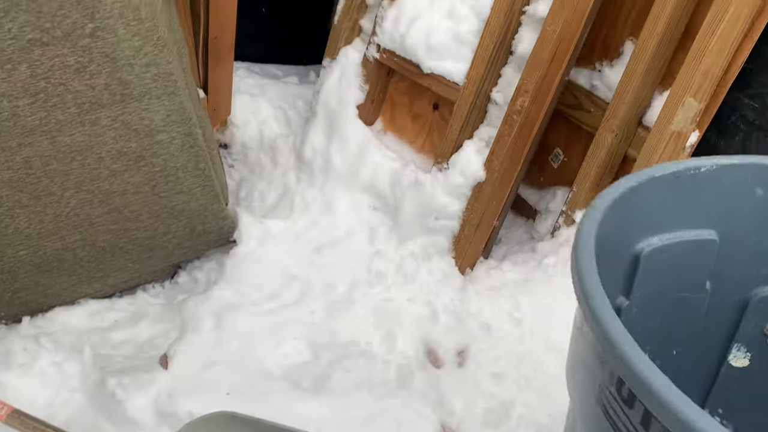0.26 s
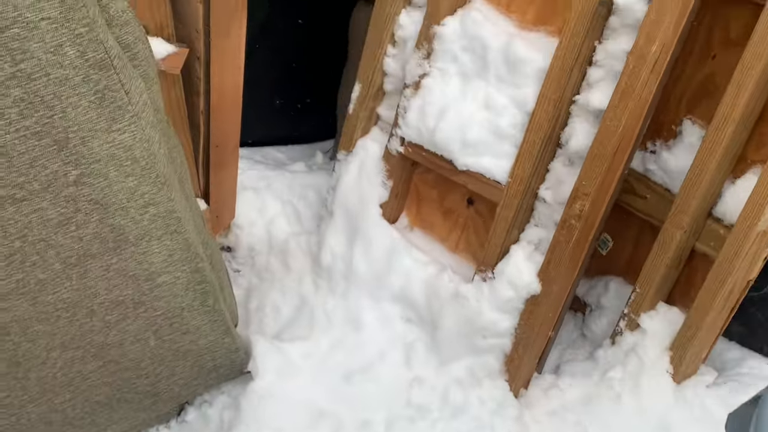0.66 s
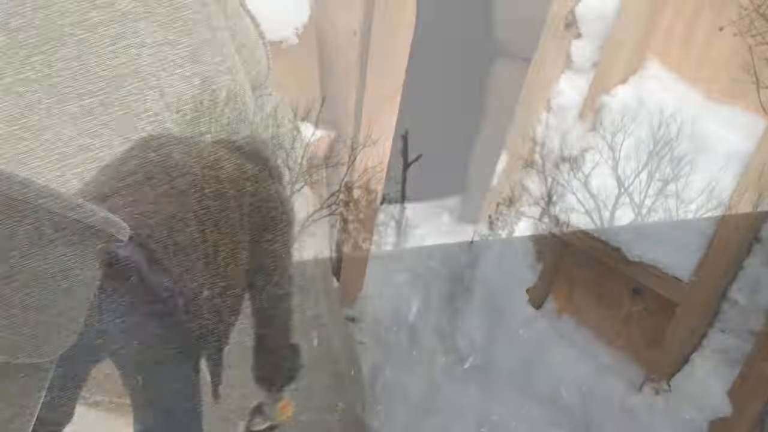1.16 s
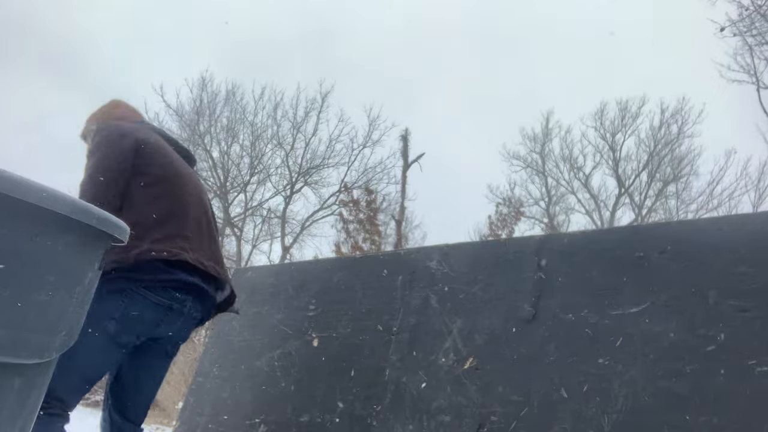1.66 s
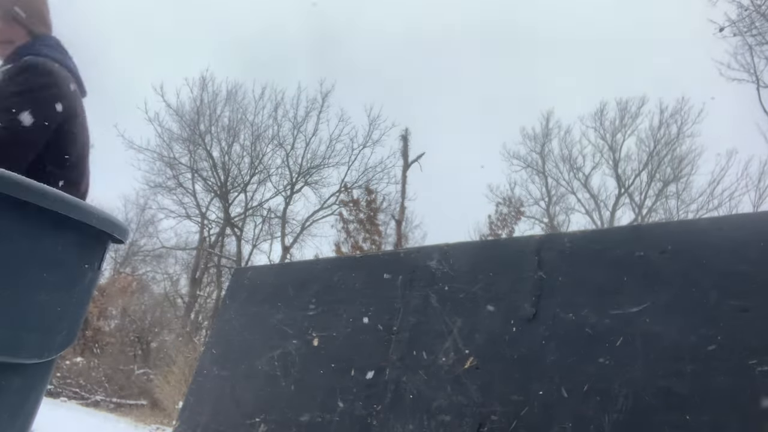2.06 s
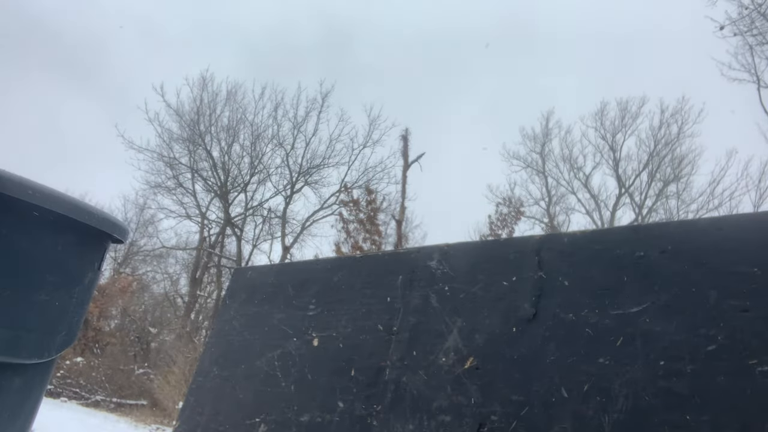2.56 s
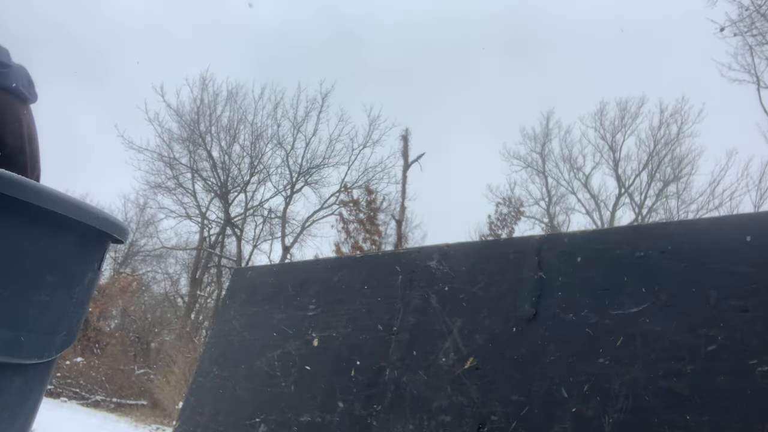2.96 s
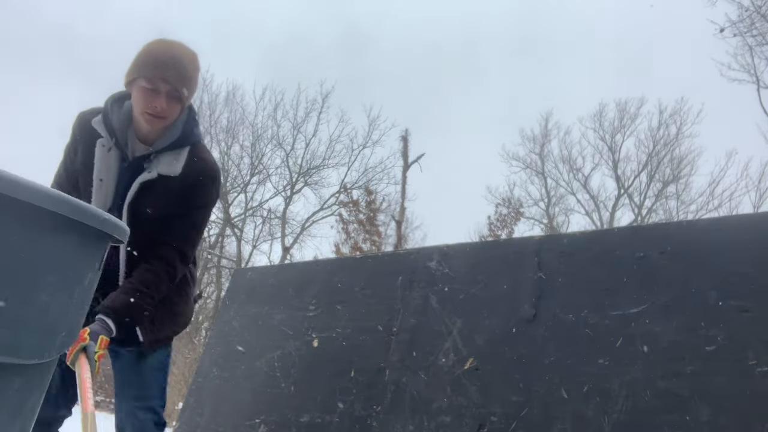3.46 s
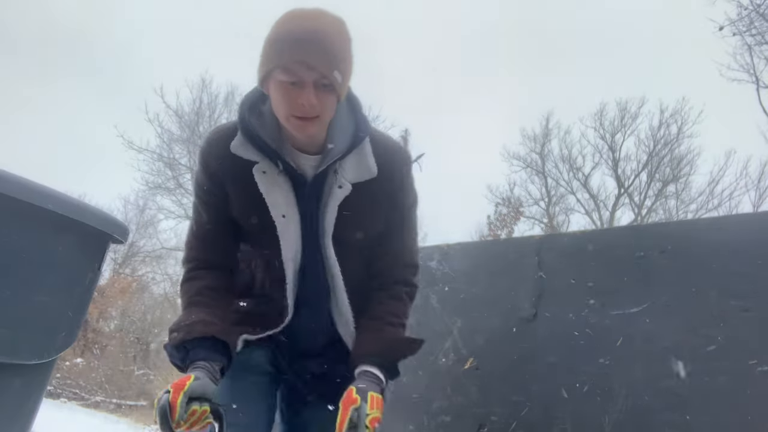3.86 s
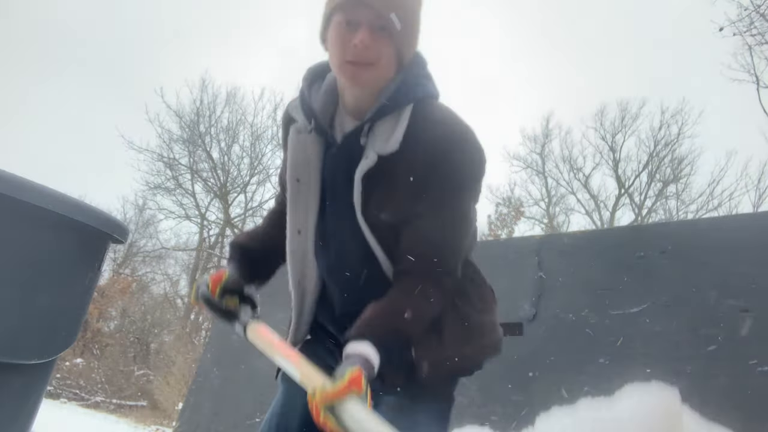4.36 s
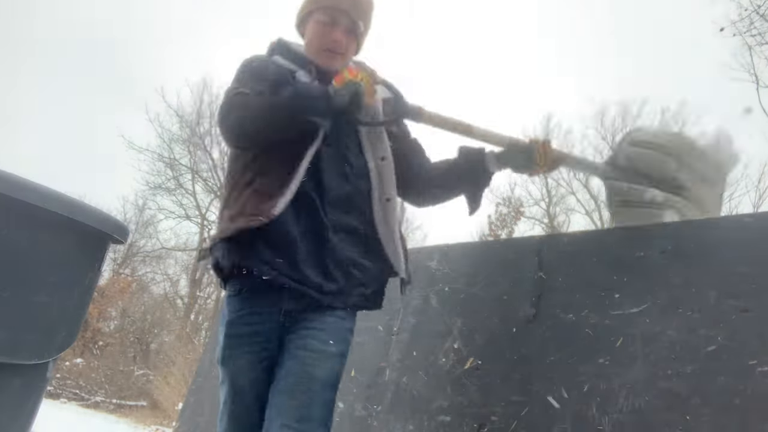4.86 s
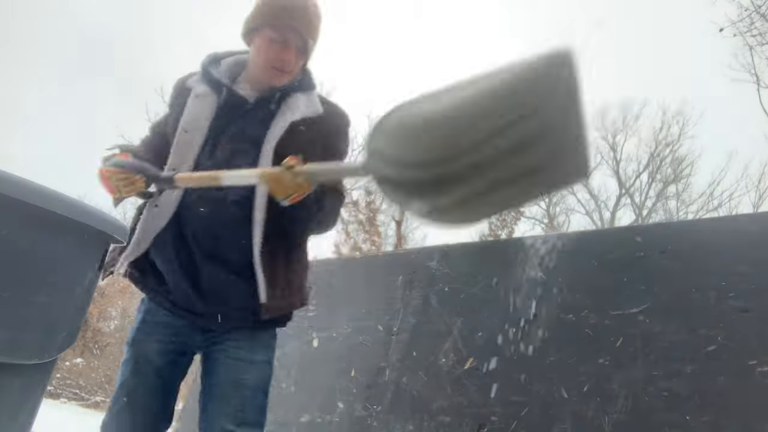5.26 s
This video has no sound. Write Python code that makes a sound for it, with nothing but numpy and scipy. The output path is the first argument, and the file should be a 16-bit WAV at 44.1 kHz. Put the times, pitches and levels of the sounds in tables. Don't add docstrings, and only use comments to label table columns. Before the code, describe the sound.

From 0 to about 1 s the sound is muffled, as from a hand-held phone: small crust cracks, soft shuffling, low buffeting air and a run of quick dull bumps, strongest near 0.85 s. The treble then opens up; a faint push is heard and a light handle tap at 1.3 s. A crunchy scoop with low soft footfalls comes at 1.45-1.7 s, followed by quieter steps around 2 s. At 2.4 s the blade knocks sharply on ice, rebounds and digs until 2.75 s. Muted snow lumps and shuffles follow. At 3.3 s the edge stabs the crust and scrapes long, bright and gritty, in juddering bursts until 3.95 s. Quiet treads and soft crunches fill 4-4.9 s. A loud hollow board thud booms at 5.0 s, with a low tread, dropping lumps and a light dragging scrape to 5.5 s. Faint distant traffic, fine snow hiss and short close echoes surround it.

```python
import sys
import numpy as np
from scipy import signal
from scipy.fft import rfft, irfft, next_fast_len
from scipy.io import wavfile
from scipy.ndimage import uniform_filter1d

SR = 44100
rng = np.random.default_rng(int(sys.argv[2]) if len(sys.argv) > 2 else 0)


def pcm_store(signal):
    levels = np.round(np.clip(np.atleast_2d(signal), -1, 1) * 32767)
    wavfile.write(sys.argv[1], SR, levels.astype(np.int16).T)


def linear_from_db(decibels):
    return 10 ** (np.asarray(decibels, float) / 20)


N = 243071
TIME = np.arange(N) / SR
SIZE = next_fast_len(N + SR // 2)
HZ = np.maximum(np.fft.rfftfreq(SIZE, 1 / SR), 1)


def along_hz(points):
    hz, value = np.transpose(points)
    return np.interp(np.log(HZ), np.log(np.maximum(hz, 1)), value)


def along_time(points):
    return np.interp(TIME, *np.transpose(points))


def through(x, response):
    return irfft(rfft(x, SIZE) * response, SIZE)[..., :N]


def unit(x):
    return x / np.sqrt(np.mean(x ** 2))


def walk(rate):
    hold = int(SR / rate)
    levels = np.repeat(rng.standard_normal(N // hold + 1), hold)
    return 1.156 * uniform_filter1d(levels, hold)[:N]


ZONES_HZ = 350, 1900, 5600


def zones():
    lows = [0] + [1 / (1 + (HZ / edge) ** 8) for edge in ZONES_HZ] + [1]
    return [np.sqrt(upper - lower) for lower, upper in zip(lows, lows[1:])]


# [pitch_hz, level_db per Hz]
YARD = [(15, -30), (25, -16), (108, 8), (503, -17), (1560, -17.5), (2280, -25), (3080, -25), (16000, -45)]
YARD_DB = -50.5
POWDER_DB, POWDER_FROM_S = -62.5, 0.91


def yard():
    powder = unit(through(rng.standard_normal(N), zones()[3]))
    powder = powder * linear_from_db(POWDER_DB + 5.7 * walk(22.8)) * (TIME > POWDER_FROM_S)
    air = unit(through(rng.standard_normal(N), linear_from_db(along_hz(YARD))))
    return powder + linear_from_db(YARD_DB + 1.1 * walk(2.74)) * air


# [time_s, level_db]
RUMBLE = [
    (0, -56),
    (.9, -50),
    (1.2, -54),
    (1.45, -80),
    (5.5, -72),
]
RUMBLE_HZ = 50


def rumble():
    wind = rng.standard_normal(N) + .2 * rng.standard_normal((2, N))
    low = 1 / (1 + (HZ / RUMBLE_HZ) ** 4) * HZ / (HZ + 30)
    return unit(through(wind, low)) * linear_from_db(along_time(RUMBLE) + 6.4 * walk(6.0))


def ring(at_s, modes, rise_cycles):
    span = slice(int(at_s * SR) + 1, int((at_s + .6) * SR))
    t = TIME[span] - at_s
    out = np.zeros(N)
    for hz, db, t60 in modes:
        rise = 1 - np.exp(-t * hz / rise_cycles)
        out[span] += linear_from_db(db) * rise * np.sin(2 * np.pi * hz * t) * np.exp(-np.log(1000) * t / t60)
    return out


# [start_s, level_db, pitch_hz]
BUMPS = [(0.096, -27, 252), (0.177, -25.5, 176), (0.348, -19, 144), (0.391, -18, 191), (0.455, -16.5, 190),
         (0.545, -13.5, 190), (0.626, -17, 184), (0.686, -19, 165), (0.733, -14, 195), (0.843, -9.5, 197),
         (0.905, -18, 186), (.945, -22, 170), (.975, -22, 180), (0.999, -19, 179), (1.03, -22, 150)]
BUMP_LOW_HZ, BUMP_LOW_DB, BUMP_T60_S = 89.3, -4, 0.097


def bumps():
    out = 0
    for at, db, hz in BUMPS:
        modes = [(hz, 0, BUMP_T60_S), (BUMP_LOW_HZ, BUMP_LOW_DB, 2.1 * BUMP_T60_S)]
        out = out + linear_from_db(db) * ring(at, modes, 0.4)
    return out


# [start_s, level_db, pitch_hz]
TREADS = [(1.559, -13, 228), (1.572, -14, 228), (1.59, -9, 225), (1.619, -15, 233), (1.648, -21, 200),
          (1.953, -20, 235), (2.038, -16.5, 135), (2.279, -19, 137), (2.405, -14, 300), (2.418, -14, 270),
          (2.434, -10.5, 326), (2.484, -17, 280), (2.459, -13, 302), (2.921, -23, 133), (3.199, -26, 127),
          (3.984, -18.5, 328), (4.04, -25, 130), (4.07, -26, 135), (4.127, -16.5, 127), (4.158, -24, 132),
          (4.419, -26, 391), (5.086, -6, 140), (5.127, -19, 125), (5.158, -18, 130)]


def treads():
    return sum(linear_from_db(db) * ring(at, [(hz, 0, .1)], 1.15) for at, db, hz in TREADS)


# [start_s, level_db, pitch_hz]
LUMPS = [(2.41, -20, 520), (2.424, -21, 450), (2.445, -22, 560), (2.484, -22, 560), (2.842, -23, 450),
         (2.877, -24, 460), (2.915, -26, 300), (2.94, -25, 420), (2.965, -25, 480), (3.009, -31, 229),
         (3.038, -30, 493), (3.094, -29, 455), (3.133, -22, 458), (3.173, -23, 441), (3.19, -26, 520),
         (3.225, -23, 226), (3.245, -23, 480), (5.172, -28, 540), (5.186, -24, 770), (5.203, -26, 530),
         (5.214, -24, 780), (5.228, -24, 290), (5.243, -25, 470), (5.262, -25, 300), (5.282, -23, 290)]
LUMP_T60_S, LUMP_OVERTONE = .06, 1.37


def lumps():
    out = 0
    for at, db, hz in LUMPS:
        modes = [(hz, 0, LUMP_T60_S), (LUMP_OVERTONE * hz, -7, .6 * LUMP_T60_S)]
        out = out + linear_from_db(db) * ring(at, modes, .8)
    return out


# [pitch_hz, level_db, decay_t60_s]
TAP = [(443, -0.5, 0.097), (686, 1, 0.083), (1300, -5, 0.044), (1910, -5.5, .03), (2330, -11, .02)]
TAP_S, TAP_DB = 1.277, -19


def handle_tap():
    return linear_from_db(TAP_DB) * ring(TAP_S, TAP, 0.71)


# [pitch_hz, level_db, decay_t60_s]
KNOCK = [(134, 0, 0.046), (260, 3.5, 0.072), (318, -8.5, 0.17), (444, 3, 0.056), (654, 5, 0.04),
         (910, -4, 0.029), (1060, -3, .03), (1290, -1, 0.026), (1572, -5, 0.047), (2557, -14, 0.021),
         (3310, -16, 0.018), (3520, -22, 0.03)]
KNOCK_S, KNOCK_DB = 2.3858, -4.5
KNOCK_REBOUND_S, KNOCK_REBOUND_DB = .0085, -5


def ice_knock():
    first = linear_from_db(KNOCK_DB) * ring(KNOCK_S, KNOCK, 1.0)
    return first + linear_from_db(KNOCK_DB + KNOCK_REBOUND_DB) * ring(KNOCK_S + KNOCK_REBOUND_S, KNOCK, .8)


# [pitch_hz, level_db, decay_t60_s]
JAB = [(264, 2, 0.078), (655, 0, 0.13), (1357, 1.5, 0.16), (1580, -14, 0.066), (2600, -32, 0.024),
       (3360, -6, 0.08)]
JAB_S, JAB_DB = 3.317, -14.5


def crust_jab():
    return linear_from_db(JAB_DB) * ring(JAB_S, JAB, 0.25)


# [pitch_hz, level_db, decay_t60_s]
BOARD = [(300, -2, 0.07), (255, -3, 0.09), (570, -9, 0.06), (800, -14, 0.06), (1140, -20, 0.024),
         (1400, -16, 0.03), (1700, -18, .03), (2650, -13, 0.013)]
# [pitch_hz, level_db, decay_t60_s]
BOARD_AIR = [(62, -14, .3), (94, -6, .25), (128, -3, 0.33), (185, -6, .3), (221, -6, .25), (369, -14, .2),
             (436, -16, .13), (690, -22, .12)]
THUD_S, THUD_DB, BOARD_AIR_LATE_S = 5.021, -2.5, .01


def board_thud():
    wood = ring(THUD_S, BOARD, 1.36)
    return linear_from_db(THUD_DB) * (wood + ring(THUD_S + BOARD_AIR_LATE_S, BOARD_AIR, 1.1))


def blows():
    return bumps() + treads() + lumps() + handle_tap() + ice_knock() + crust_jab() + board_thud()


# [pitch_hz, level_db per Hz]
SNOW = [(24, -57), (40, -11.5), (94, 1), (155, -6), (226, 0), (433, -5), (715, -6), (1120, -8), (1480, -5),
        (1950, -18.5), (2300, -17), (3220, -14), (6020, -15.5), (8130, -14.5), (14800, -13.5),
        (16000, -54.5)]
# [pitch_hz, width_hz, lift_db]
BLADE = [(129, 61, 10.5), (230, 230, 4), (473, 350, 3), (700, 74, 3.5), (1040, 26, 1), (1245, 45, 2.5),
         (1514, 34, 4.5), (2553, 100, 2.5), (3240, 160, 4), (4480, 150, 4), (5110, 170, -1.5),
         (7650, 98, 0), (16200, 460, -18)]


def blade_colour():
    lift_db = sum(db / (1 + (2 * (HZ - hz) / width) ** 2) for hz, width, db in BLADE)
    return linear_from_db(along_hz(SNOW[:-1]) + lift_db)


def crystals(spread_db):
    size_db = spread_db * np.minimum(rng.exponential(size=N), 5)
    return rng.standard_normal(N) * uniform_filter1d(linear_from_db(size_db), size=24)


CRACK_CRUMBLE_S, CRACK_T60_S, CRACK_RISE_S = 0.0028, 0.038, .0007
CRUNCH_T60_S, CRUNCH_RISE_S = 0.05, 0.0037
FIRST_SNAP_DB, FIRST_SNAP_S = 4.5, 0.0018


def crack_shape(t):
    return np.minimum(t / CRACK_RISE_S, 1) * linear_from_db(FIRST_SNAP_DB * np.exp(-t / FIRST_SNAP_S))


def crunch_shape(t):
    return np.minimum(t / CRUNCH_RISE_S, 1)


# [start_s, level_db, edge_contact_db]
HAND_CRACKS = [(.004, -34, -20), (.025, -31, -17), (.059, -36, -13), (.088, -28.5, -21), (.136, -33, -16),
               (.158, -33.5, -15), (.18, -28, -23), (.209, -34, -10), (.231, -31, -14), (.256, -31, -11),
               (.281, -33, -9), (.302, -27, -14), (0.317, -17, -18), (.352, -30, -16), (.381, -30, -16),
               (.414, -32, -21), (.43, -38, -3), (0.451, -21, -17.5), (.51, -37, -5), (.54, -27.5, -12),
               (.619, -27.5, -8), (.587, -39, -12), (.66, -38, -12), (.682, -32, -12), (.725, -26, -18),
               (.776, -38, -8), (.883, -34, -8), (.901, -31, -14)]
# [start_s, level_db, edge_contact_db]
CRACKS = [(1.277, -23, -14), (1.448, -32.5, -13), (1.5075, -24, -9), (1.747, -32, -25), (1.821, -44, -6),
          (1.87, -38, -6.5), (1.952, -21, -17.5), (2.007, -17, -14.5), (2.209, -37, -10), (2.236, -33, -25),
          (2.271, -22, -22.5), (2.344, -24, -14), (2.3874, -6, -20), (2.874, -33, -35), (2.973, -31, -14),
          (3.004, -41, -5), (3.064, -44, -8), (3.093, -29.5, -21), (3.131, -30, -23), (3.171, -25, -22),
          (4.118, -38, -6), (4.168, -47, 8), (4.196, -36, -10), (4.209, -35, -20), (4.956, -22, -19),
          (4.99, -26, -13)]
# [start_s, level_db, edge_contact_db, powder_db, crumble_s]
CRUNCHES = [(.796, -27, -12, -17, .014), (.813, -18, -19, -20, .026), (1.2, -27, -12, -14, .022),
            (1.39, -36, -17, -2, 0.02), (1.507, -21.5, -9, -5.5, 0.013), (1.539, -18, -13, -15, 0.02),
            (1.566, -15, -12, -16, .022), (1.6, -18, -12, -16, .01), (1.624, -19, -10, -16, .018),
            (1.915, -41, -4, 2, 0.026), (2.366, -27, -7, 2.5, 0.026), (2.396, -24, -8, -14, .014),
            (2.51, -22, -6, -12, .014), (2.54, -13.5, -20, -25, 0.015), (2.599, -20.5, 0, -23, 0.024),
            (2.654, -23.5, -6, -5, 0.01), (2.727, -26.5, -5, 5.5, 0.016), (2.788, -33, -4, -28, 0.04),
            (3.265, -26, -7, -8, .01), (3.309, -7, -9.5, -3.5, 0.022), (3.357, -17, -21, -23, 0.036),
            (3.401, -16.5, -3.5, -11, 0.023), (3.443, -15.5, -1.5, -9, 0.021),
            (3.528, -12, -10, -10, 0.022), (3.573, -16, -6, -8, .012), (3.608, -20, 0, -5, .01),
            (3.666, -15, -9, -10, .025), (3.728, -16, -9, -10, .014), (3.805, -20, -8, -8, .01),
            (3.849, -17.5, -7, -7, 0.012), (3.172, -26, -16, -25, .025), (3.987, -25, -8, -1, 0.012),
            (4.328, -35, -4, 3, .03), (4.41, -30, -9, -2, .03), (4.546, -20, -7, -5, 0.036),
            (5.165, -37, -18, -25, .07), (4.89, -21, -7, -9, .012), (5.018, -16.5, -17, -24, 0.013),
            (5.306, -23.5, -28, -7, 0.04)]
CRACK_POWDER_PER_EDGE, CRACK_POWDER_DB = 0.74, -5.5
CRACK_RING = .55


def cracking():
    events = []
    for at, db, edge in HAND_CRACKS + CRACKS:
        powder = CRACK_POWDER_PER_EDGE * edge + CRACK_POWDER_DB
        events.append((at, db, edge, powder, CRACK_CRUMBLE_S, CRACK_T60_S, crack_shape))
    for at, db, edge, powder, crumble in CRUNCHES:
        events.append((at, db, edge, powder, crumble, CRUNCH_T60_S, crunch_shape))
    showers = np.zeros((3, N))
    for at, db, edge, powder, crumble, t60, shape in events:
        start = int(at * SR) + 1
        t = TIME[start:start + SR // 3] - at
        shower = shape(t) * np.exp(-np.log(1000) * np.maximum(t - crumble, 0) / t60)
        showers[:, start:start + len(t)] += linear_from_db(db - 9 + np.array([[0], [edge], [powder]])) * shower
    snaps, colour = crystals(1.5), blade_colour() ** CRACK_RING
    return [unit(through(snaps, colour * zone)) * shower for zone, shower in zip(zones()[1:], showers)]


# [time_s, level_db, edge_contact_db]
PUSH = [
    (.95, -60, 2),
    (.99, -47, -1),
    (1.02, -39, 2),
    (1.09, -42, 2.5),
    (1.17, -40.5, 4),
    (1.23, -38.5, -4),
    (1.3, -60, -8),
]
# [time_s, level_db, edge_contact_db]
SCOOP = [
    (1.43, -70, -10),
    (1.446, -45.5, -9.5),
    (1.566, -24, -6.5),
    (1.648, -27.5, -10),
    (1.678, -51.5, -34),
    (1.74, -56, -20),
]
# [time_s, level_db, edge_contact_db]
DIG = [
    (2.39, -45, -18),
    (2.415, -33, -16.5),
    (2.483, -30, -9.5),
    (2.539, -21.5, -7.5),
    (2.633, -32, -1),
    (2.753, -41.5, -8.5),
    (2.8, -62, -11),
]
# [time_s, level_db, edge_contact_db]
LONG_SCRAPE = [
    (3.3, -40, -10),
    (3.33, -21, -6),
    (3.42, -23.5, -4),
    (3.528, -20.5, -1),
    (3.644, -25.5, 2.5),
    (3.686, -21, -1.5),
    (3.778, -25.5, 1),
    (3.91, -32, -5.5),
    (3.98, -46, -3.5),
]
# [time_s, level_db, edge_contact_db]
RETURN = [
    (5.26, -61, -2),
    (5.301, -37.5, 3.5),
    (5.42, -35.5, 3),
    (5.52, -35.5, -4.5),
]
STROKE_HZ = [
    1100,
    940,
    590,
    943,
    540,
]
# [peak_s, level_db, rise_s per 20 dB, fall_s per 20 dB, edge_contact_db]
HAND_SHUFFLES = [
    (.308, -36, 0.17, 0.09, -7),
    (.38, -53, 0.3, 1.1, 2.5),
    (.734, -52, 0.2, 0.2, 1),
    (.84, -34, 0.04, 0.14, -14),
    (.9, -43, 0.12, 0.6, -6),
]
# [peak_s, level_db, rise_s per 20 dB, fall_s per 20 dB, edge_contact_db]
SHUFFLES = [(1.29, -32, 0.03, 0.12, -20), (1.39, -48.5, 0.17, 0.057, -1), (2.01, -30, 0.15, 0.096, -16.5),
            (2.236, -39, 0.11, 0.24, -24), (2.352, -30.5, .2, 0.062, -19.5),
            (2.831, -36, 0.19, 0.18, -10.5), (2.95, -31, 0.25, 0.1, -27), (3.05, -41, .12, .12, -25),
            (3.279, -26.5, 0.15, 0.18, -18.5), (4.385, -42, 0.13, 0.13, 5.5), (4.0, -34, 0.02, 0.1, -5),
            (4.152, -42, 0.23, 0.2, -15), (4.43, -33, .14, 0.15, -7), (4.562, -30, 0.088, 0.14, -1.5),
            (4.75, -42.5, .12, 0.08, 0), (4.89, -35, 0.023, 0.22, -1.5), (5.012, -35, 0.32, 0.098, -14.5),
            (5.21, -32, 0.14, 0.26, -14), (4.62, -32.5, 0.28, 0.099, -18)]
HAND_SHUFFLE_HZ, SHUFFLE_HZ = 895, 495
POWDER_PER_EDGE = 1.41


def effort():
    moves = list(zip((PUSH, SCOOP, DIG, LONG_SCRAPE, RETURN), STROKE_HZ))
    for table, hz in ((HAND_SHUFFLES, HAND_SHUFFLE_HZ), (SHUFFLES, SHUFFLE_HZ)):
        for peak, db, rise, fall, edge in table:
            curve = [(peak - 3 * rise, db - 60, edge), (peak, db, edge), (peak + 3 * fall, db - 60, edge)]
            moves.append((curve, hz))
    t, total = TIME[::32], 1e-12
    for curve, hz in moves:
        s, db, edge = np.transpose(curve)
        edge = np.interp(t, s, edge)
        bite, hiss = linear_from_db(2 * edge), linear_from_db(2 * POWDER_PER_EDGE * edge)
        shares = np.array([np.ones(len(t)), bite, hiss, np.full(len(t), np.log(hz))])
        total = total + linear_from_db(2 * np.interp(t, s, db, -120, -120)) * shares
    mids, bite, hiss, pitch = (np.interp(TIME, t, row) for row in total)
    return 10 * np.log10(mids), 10 * np.log10(bite / mids), 10 * np.log10(hiss / mids), np.exp(pitch / mids)


def patchy(snaps, response, patchy_db, rate, loud_hz, lift_db):
    out, spectrum = 0, rfft(snaps, SIZE) * response
    place = 6 * np.log2(HZ / 40)
    for k in range(54):
        weight = np.cos(np.pi / 2 * np.clip(place - k, -1, 1)) ** 2
        if np.max(weight * response) > .03 * np.max(response):
            octaves = k / 6 - np.log2(loud_hz / 40)
            gain = linear_from_db(patchy_db * walk(rate) + lift_db * np.exp(-(octaves / 0.65) ** 2))
            out = out + irfft(spectrum * weight, SIZE)[:N] * gain
    return unit(out)


PINGS_PER_S, PING_DB = 50, -12.5


def pings(mids_db, bite_db):
    out = 0
    pressure_db = mids_db + 0.33 * np.minimum(mids_db + 23.5, 0)
    for hz, width, db in BLADE[2:11]:
        strikes = (rng.random(N) < PINGS_PER_S / SR) * rng.standard_normal(N)
        pole = np.exp((2j * np.pi * hz - 1.15 * width) / SR)
        rung = unit(signal.lfilter([1], [1, -pole], strikes).imag)
        out = out + rung * linear_from_db(db - 12.0 + pressure_db + bite_db * (hz > ZONES_HZ[1]))
    return linear_from_db(PING_DB) * out


GRIT_PER_S, GRIT_DB, GRIT_SPREAD_DB, GRIT_RING = 220, -10.5, 4.5, .8


def grit(mids_db, bite_db):
    chance = rng.random((3, N))
    size = linear_from_db(-GRIT_SPREAD_DB * np.log(chance[2] + .01))
    grains = (chance[0] < GRIT_PER_S / SR) * np.sign(chance[1] - .5) * size
    clicks = unit(through(grains, blade_colour() ** GRIT_RING * HZ / (HZ + 500)))
    return clicks * linear_from_db(GRIT_DB + mids_db + .4 * bite_db)


# [time_s, level_db]
WEIGHT = [(0, -48), (.22, -35.5), (.85, -38), (1.3, -50), (1.57, -27.5), (1.75, -43.5), (2.2, -46.5),
          (2.38, -37), (2.41, -20), (2.75, -48.5), (2.94, -28.5), (3.08, -37), (3.3, -28.5), (3.7, -43),
          (4.15, -35), (4.3, -50), (4.95, -44), (5.5, -41.5)]
LOAD_BASS_DB = -8
POWDER_AT_EDGE_DB = 1.5


def scraping():
    mids_db, bite_db, hiss_db, loud_hz = effort()
    hiss_db = hiss_db + POWDER_AT_EDGE_DB
    bass_db = 10 * np.log10(linear_from_db(2 * LOAD_BASS_DB) + linear_from_db(2 * (along_time(WEIGHT) - mids_db)))
    judder_db = 0.87 * walk(45) + 1.5 * walk(140)
    sift_db = 2.0 * walk(35) + 0.88 * walk(90)
    # level_db, share of judder, patchiness_db, patches per s, sift_db
    settings = ((bass_db, .3, 4.1, 14, 0), (0, .7, 3.73, 25, 0),
                (bite_db, 1.01, 3.2, 35, 0), (hiss_db, 1.1, 1.3, 40, sift_db))
    colour, out = blade_colour(), []
    for zone, (level_db, grip, patchy_db, rate, spurt_db) in zip(zones(), settings):
        band = patchy(crystals(3.5), colour * zone, patchy_db, rate, loud_hz, 6.2)
        out.append(band * linear_from_db(mids_db + level_db + grip * judder_db + spurt_db))
    return out + [pings(mids_db, bite_db), grit(mids_db, bite_db)]


# [time_s, length_s, depth_db]
SKIPS = [(1.49, .034, -12), (1.531, .012, -9), (3.351, .013, -14), (3.388, .016, -14), (3.429, .01, -9),
         (3.522, .01, -5), (2.575, .015, -6), (2.262, .014, -6), (2.336, .014, -6), (2.362, .012, -6),
         (3.16, .02, -6), (3.302, .014, -6), (2.645, .015, -6), (4.535, .018, -8), (4.66, .025, -6),
         (4.82, .05, -8), (4.44, .014, -5), (4.948, .014, -5), (.17, .014, -6), (1.437, .016, -7),
         (3.085, .016, -7), (3.121, .016, -7), (4.88, .016, -6), (5.008, .014, -5)]
SKIP_RING_SHARE = 0.48


def skipping(scrape, cracks):
    bass, mids, *upper = scrape
    mid_cracks, *upper_cracks = cracks
    skip_db = sum(db * np.exp(-((TIME - at) / length * 2) ** 4) for at, length, db in SKIPS)
    low = bass * linear_from_db(0.5 + 0.32 * skip_db)
    middle = (mids + mid_cracks) * linear_from_db(SKIP_RING_SHARE * skip_db)
    return low + middle + sum(upper + upper_cracks) * linear_from_db(skip_db)


MUFFLE_DB, MUFFLE_HZ, MUFFLE_UNTIL_S = -30, 6660, 0.97


def muffled(sound):
    held = np.clip((MUFFLE_UNTIL_S - TIME) / .03 + 1, 0, 1)
    return sound * (1 - held) + held * through(sound, linear_from_db(MUFFLE_DB) + 1 / (1 + (HZ / MUFFLE_HZ) ** 6))


# [pitch_hz, lead_radians]
PORT_LAG = [(1000, 0), (4900, -.2), (5650, 3.1), (8100, 6.3), (10200, 8.4), (11500, 9.3), (13300, 11.8),
            (15100, 12.6)]
# [pitch_hz, level_db]
PORT_TILT = [(100, .6), (600, 2), (1500, -.5), (4000, -2.5), (12000, -1.5)]
# [pitch_hz, level_db]
SCATTER = [(60, -6), (200, -8), (500, -8), (1500, -3), (3000, 0), (8000, 1), (13000, -4)]
FENCE_T60_S, MIC_LOW_HZ, TOP_HZ = .045, 52.6, 15850


def two_ports(sound):
    mic = (1j * HZ / MIC_LOW_HZ / (1 + 1j * HZ / MIC_LOW_HZ)) ** 3 * (HZ < TOP_HZ)
    tail = SR // 5
    echoes = rng.standard_normal((2, tail)) * np.exp(-np.log(1000) * TIME[:tail] / FENCE_T60_S)
    out = through(sound, mic * linear_from_db(along_hz(SCATTER)) * rfft(unit(echoes) / np.sqrt(tail), SIZE))
    out = out * np.tanh([1.5 * walk(25), 1.5 * walk(25)])
    aside = .5 + .5 * np.tanh(1.5 * walk(5))
    for share, stretch in ((aside, .92), (1 - aside, 1.07)):
        port = linear_from_db(along_hz(PORT_TILT) / 2) * np.exp(.5j * stretch * along_hz(PORT_LAG))
        out = out + through(share * sound, mic * np.array([port, 1 / port]))
    return out


def scene():
    sound = skipping(scraping(), cracking()) + blows() + yard()
    return two_ports(muffled(sound)) + rumble()


def band_limit(x):
    return signal.sosfilt(signal.butter(12, 16830, fs=SR, output="sos"), x)


def record(dry):
    mix = np.tanh(dry / 1.386) * 1.212
    return band_limit(mix)


dry = scene()
out = record(dry)
pcm_store(out)
```